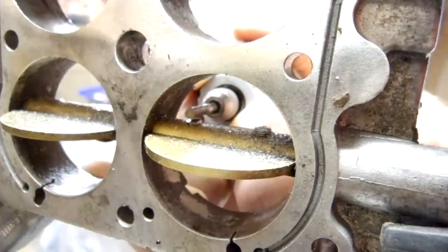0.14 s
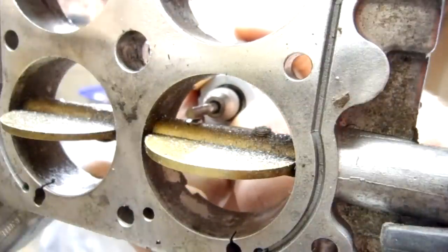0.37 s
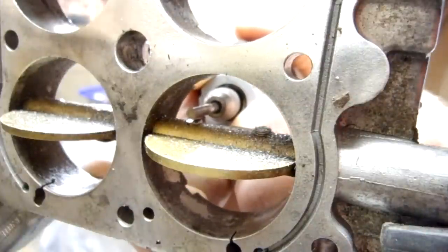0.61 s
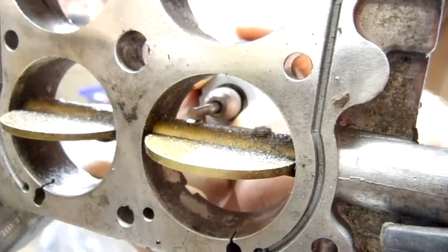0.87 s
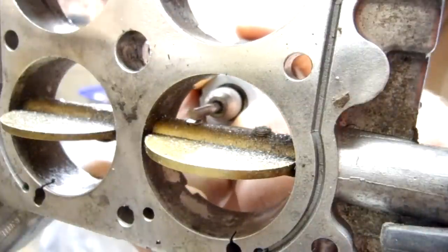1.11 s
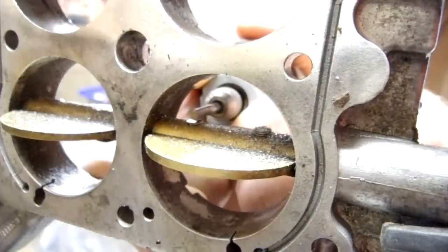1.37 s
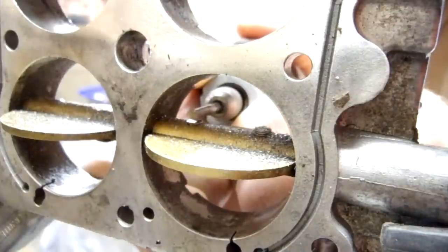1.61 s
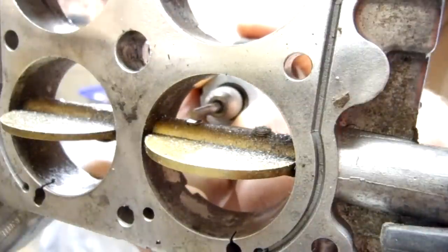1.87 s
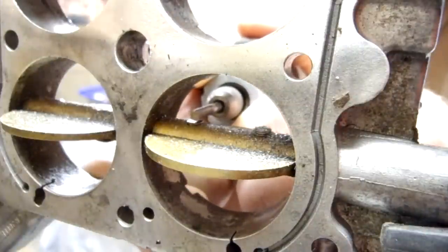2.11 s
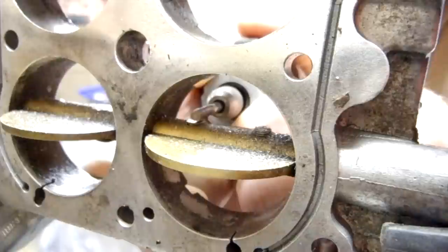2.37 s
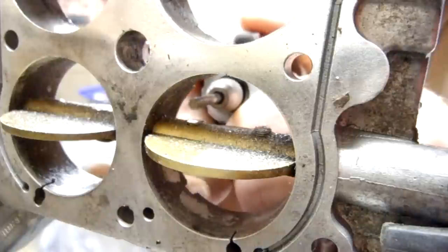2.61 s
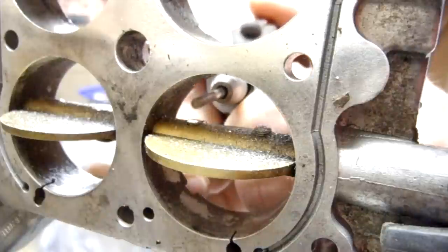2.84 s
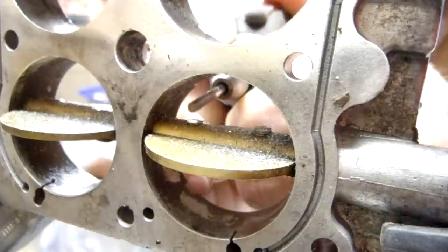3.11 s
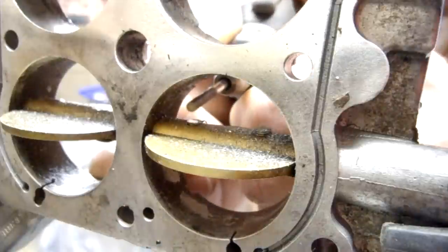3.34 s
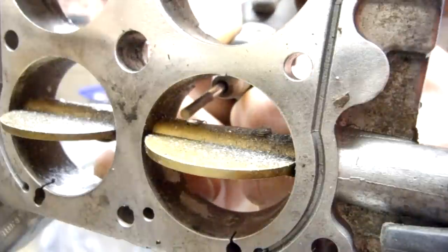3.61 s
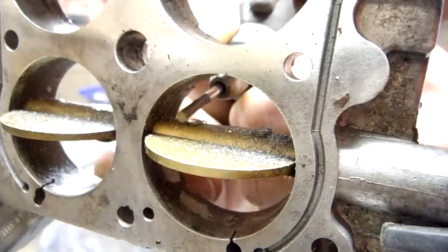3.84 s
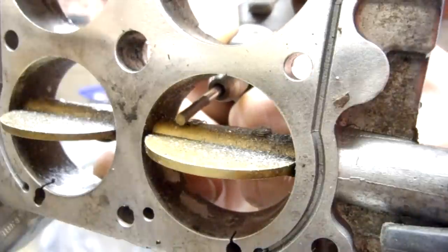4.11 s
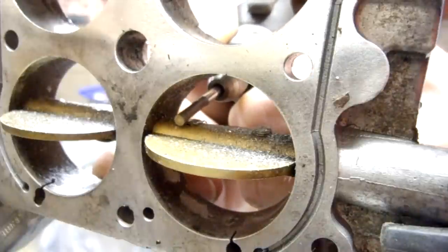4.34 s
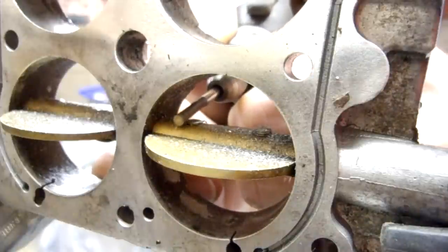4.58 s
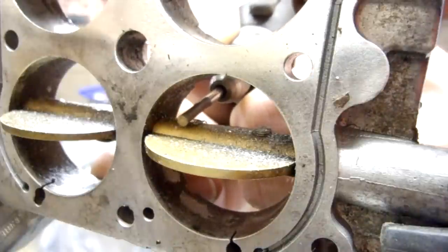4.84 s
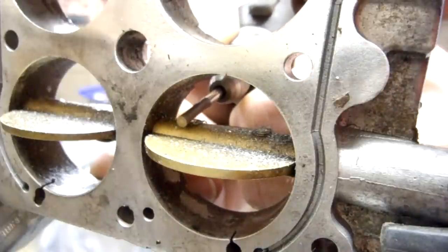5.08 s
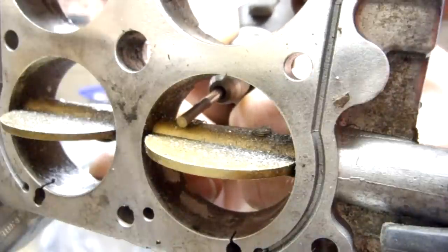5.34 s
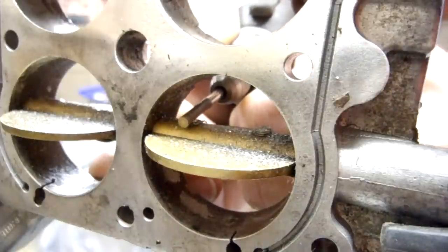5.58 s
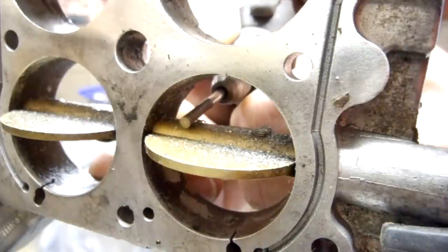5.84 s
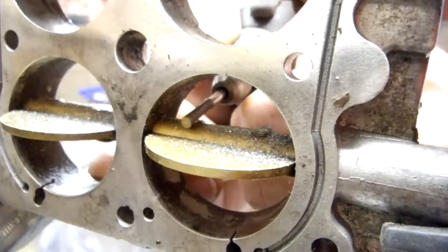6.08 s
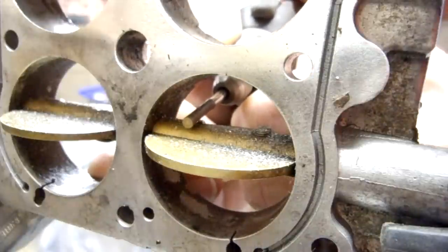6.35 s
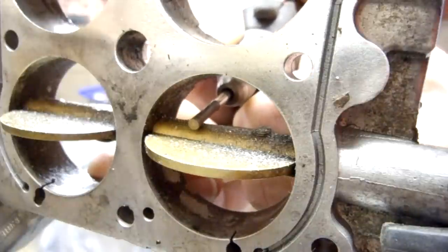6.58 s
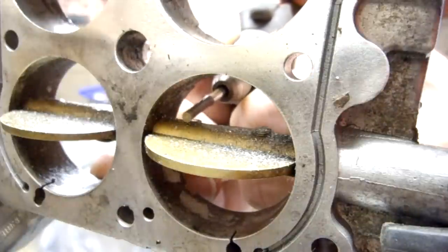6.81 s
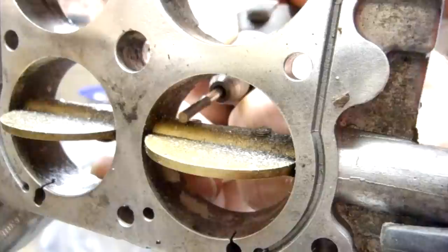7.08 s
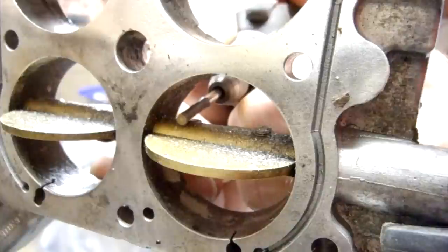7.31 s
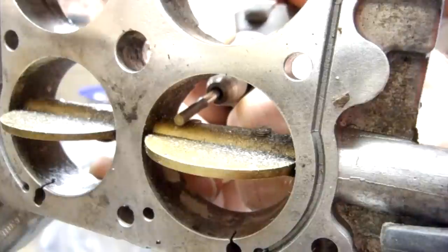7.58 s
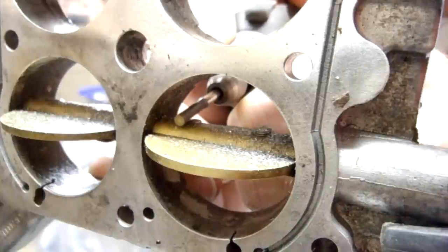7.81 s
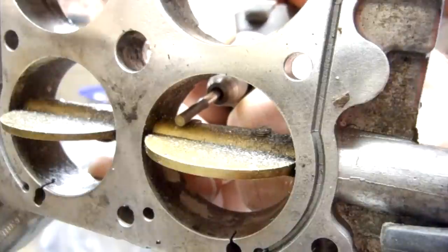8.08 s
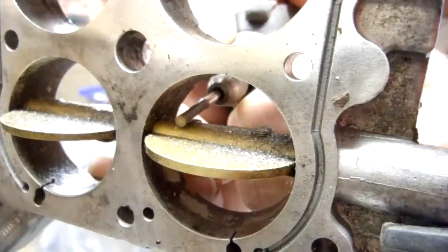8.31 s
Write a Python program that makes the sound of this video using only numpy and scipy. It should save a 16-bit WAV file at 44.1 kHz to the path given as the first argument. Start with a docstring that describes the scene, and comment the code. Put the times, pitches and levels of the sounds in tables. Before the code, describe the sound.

Close, bright rotary-burr grinding on a brass plate, steady then rougher in bursts, with airy motor whine swelling in the gaps over faint hum.

```python
"""A small rotary tool grinds a brass part in a clamped casting, close to a phone in a workshop;
between cuts the motor's rush and bearing whistles swell up over a low mains hum.
Grinding: near-repeating blows once a turn excite resonances, with clean multiples of the turn rate.
Motor: tones locked to the shaft, coloured noise for the air, an imbalance tone and hum.
The shaft turns more slowly under load; a short diffuse tail differs between the sides."""
import sys
import numpy as np
from scipy import signal
from scipy.fft import rfft, irfft
from scipy.io import wavfile
from scipy.ndimage import uniform_filter1d, map_coordinates

SR = 44100
rng = np.random.default_rng(int(sys.argv[2]) if len(sys.argv) > 2 else 0)


def gain_from_db(level_db):
    """Turn a decibel level (scalar or array-like) into a linear amplitude factor."""
    decades = np.asarray(level_db, float) / 20
    return 10 ** decades


def to_wav(s):
    """Save 16-bit WAV."""
    ch = np.atleast_2d(s).T  # columns
    pcm = np.round(np.clip(ch, -1, 1) * 32767)  # PCM
    wavfile.write(sys.argv[1], SR, pcm.astype(np.int16))


N = 372183
T = np.arange(N) / SR
BINS_HZ = np.fft.rfftfreq(N, 1 / SR) + 1  # +1 keeps log and division finite

# spots where the burr bears: [from t/s, bore over plate/dB, shank over bite/dB, sizzle over bite/dB]
SPOTS = [(0, -4.5, -15, 0), (.3, 1, -10, 0.5), (.85, 0.5, -16.5, -1), (1.5, -2.5, -13.5, -1.5),
         (2.05, -0.5, -15, -0.5), (4.1, 14, -6.5, -11), (4.24, 9.5, -1.5, -3.5), (4.46, 0.5, -5.5, -4),
         (4.76, 6, -7.5, -3.5), (5.45, 3, -14.5, -3.5), (6.3, 2.5, -16, -5), (7.28, 7.5, -7, -4),
         (7.55, 2.5, -11.5, -2.5)]


def unit(x):
    """Scale to rms 1."""
    return x / np.sqrt(np.mean(x ** 2))


def columns(table):
    """Curve columns interpolated at every sample."""
    s, *cols = np.transpose(table)
    return [np.interp(T, s, c) for c in cols]


def contact_columns(tables):
    """Curves of all contacts, at -80 dB while the burr is lifted off."""
    rows = list(tables[0])
    off = (-80,) * (len(rows[0]) - 1)
    for table in tables[1:]:
        if table[0][0] - rows[-1][0] > 0.1:
            rows += [(rows[-1][0] + 0.01, *off), (table[0][0] - 0.01, *off)]
        rows += table
    return columns(rows)


def at_spot(table, size=3000):
    """Per-spot values at every sample; the burr takes size samples to move on."""
    spot = np.searchsorted(np.array(SPOTS)[:, 0], T, side="right") - 1
    return uniform_filter1d(np.array(table, float)[spot], size, axis=0).T


def colour(x, points):
    """Shape the spectrum by (f/Hz, gain/dB) points, linear in log frequency."""
    hz, db = np.transpose(points)
    gain_db = np.interp(np.log(BINS_HZ), np.log(hz), db)
    return irfft(rfft(x) * gain_from_db(gain_db), N)


def coloured_noise(points):
    """Noise of rms 1 with the given spectral shape."""
    return unit(colour(rng.standard_normal(N), points))


def walk(rate_hz):
    """Random levels held 1 / rate_hz and slewed twice; spread near 1."""
    k = int(SR / rate_hz)
    held = np.repeat(rng.standard_normal(N // k + 1), k)
    return 1.3 * uniform_filter1d(uniform_filter1d(held, k), k)[:N]


def shaft():
    """Shaft angle in turns: the running sum of the turn rate."""
    # shaft speed: [t/s, turn rate/Hz]
    speed = [(0, 270.1), (.2, 271.0), (.47, 268.9), (.64, 266.6), (.95, 264.8), (1.31, 264.7),
             (1.76, 261.6), (1.97, 261.5), (2.06, 267.2), (2.14, 270.6), (2.25, 271.9), (2.54, 272.8),
             (2.62, 276.2), (2.75, 276.5), (3.94, 276.7), (4.2, 276.1), (4.26, 274.9), (4.43, 274.4),
             (4.53, 269.0), (4.65, 268.4), (4.78, 272.8), (4.95, 274.2), (5.29, 274.4), (5.38, 271.9),
             (5.52, 270.3), (6.03, 271.4), (6.17, 270.6), (6.31, 272.2), (6.58, 272.8), (6.72, 276.5),
             (7.68, 276.0), (7.92, 272.6), (8.09, 269.4), (8.44, 268.0)]
    return np.cumsum(columns(speed)[0]) / SR


def mains_hum():
    """Hum with a weak third harmonic and wandering level, over low rumble noise."""
    # rumble spectrum: [f/Hz, relative density/dB per Hz]
    rumble_shape = [(15, -3), (25, -1), (45, 1), (75, -9), (120, -17.5), (200, -68)]
    hum_hz = 57.9
    wave = np.sin(2 * np.pi * hum_hz * T) + gain_from_db(-22.5) * np.sin(6 * np.pi * hum_hz * T)
    hum = np.sqrt(2) * gain_from_db(1.6 * walk(9)) * wave
    return hum + gain_from_db(-6.5) * coloured_noise(rumble_shape)


def low_rush():
    """Low part of the motor's rush, as steady coloured noise."""
    # rush spectrum: [f/Hz, relative density/dB per Hz]
    rush_shape = [(47, -39), (80, -30.5), (129, -16.5), (222, -18), (272, -17.5), (329, -17), (765, -10.5),
                  (823, -8), (1260, -6.5), (1520, 0), (2600, -10), (3380, -54), (5720, -120)]
    return coloured_noise(rush_shape)


def air_hiss():
    """Air through the motor: high coloured noise."""
    # hiss spectrum: [f/Hz, relative density/dB per Hz]
    hiss_shape = [(1400, -36), (2200, -12), (2700, -10), (4100, -12), (4830, -5), (5150, -5), (5300, -10),
                  (5800, -8), (8100, -7), (9000, -9), (10800, -8), (11400, -2), (11900, -7), (13100, -11),
                  (14200, -8)]
    return coloured_noise(hiss_shape)


def bearing(turn, count=150):
    """Balls and cage add a thicket of faint tones at random ratios to the shaft."""
    ratio, size, start = rng.random((count, 3)).T
    return unit(sum(gain_from_db(-9 * s) * np.sin(2 * np.pi * ((11 + 40 * r) * turn + p))
                    for r, s, p in zip(ratio, size, start)))


def bearing_whistles(turn):
    """Tones at fixed ratios to the shaft, each wandering in level and phase."""
    # whistles when running free: [f/Hz, relative level/dB]
    tones = [(829.0, -45), (990.5, -48), (2492, -42), (4689, -44), (4980, -34), (5556, -43), (5943, -43),
             (6363, -43), (6535, -46), (6934, -45), (7004, -44), (7111, -45), (7273, -46), (8059, -44),
             (8161, -46), (8280, -38), (8899, -48), (9808, -42), (9959, -47), (10148, -38), (10314, -38),
             (11052, -40), (11267, -40), (11332, -35), (11606, -38), (12161, -46), (12236, -46),
             (12516, -44), (13695, -44), (13997, -48)]
    free_hz = 276.6
    return sum(gain_from_db(db + 1.7 * walk(7.8)) * np.sin(2 * np.pi * (hz / free_hz * turn + 0.09 * walk(30)))
               for hz, db in tones)


def motor(turn):
    """Whistles, hiss and bearing throbbing once a turn, low rush, imbalance tone and hum."""
    # motor as heard: [t/s, common rush and whistle gain/dB, imbalance tone rms/dB, hum gain/dB]
    levels = [(0, -60.5, -67, -52), (.45, -58.5, -69.5, -48.5), (.84, -64, -64, -51),
              (1.15, -59.5, -55, -48), (1.45, -64, -57, -52), (1.9, -62, -66, -54), (2.42, -60, -76, -49),
              (2.49, -61.5, -61, -49), (2.63, -61.5, -58, -47), (2.72, -54.5, -51.5, -41),
              (3.01, -48.5, -46.5, -43), (3.4, -46.5, -45, -46), (4.14, -45, -44, -42),
              (4.4, -53, -51, -46), (4.79, -60.5, -55.5, -50), (5.5, -58.5, -63.5, -50),
              (6.1, -55, -61.5, -49), (6.7, -56.5, -52.5, -45), (6.86, -51.5, -51, -47.5),
              (7.4, -47.5, -47, -42), (7.52, -53.5, -52, -45), (7.9, -56.5, -54, -50),
              (8.09, -59, -71, -51), (8.44, -60.5, -78, -50)]
    rush_db, tone_db, hum_db = columns(levels)
    whistle_swell_db_per_db, free_rush_db = 0.25, -40.5
    # whistles swell faster than the rush
    whistle_db = 52 + whistle_swell_db_per_db * (rush_db - free_rush_db)
    throb = 1 + 0.047 * np.cos(2 * np.pi * turn)
    running = gain_from_db(whistle_db) * bearing_whistles(turn)
    running += gain_from_db(25.0) * air_hiss() * throb
    running += gain_from_db(16.5) * bearing(turn) * throb
    running += gain_from_db(17.0) * low_rush()
    imbalance = np.sqrt(2) * np.sin(2 * np.pi * turn)
    return gain_from_db(rush_db) * running + gain_from_db(tone_db) * imbalance + gain_from_db(hum_db) * mains_hum()


def casting_drone(turn):
    """The casting drones on multiples 2, 3 and 4 of the turn rate while the burr bears."""
    # drone, one table a contact: [t/s, second/dB, third/dB, fourth multiple/dB]
    drone = [
        [(0.0, -53.5, -48.5, -44), (0.43, -50.5, -48, -39), (0.45, -54, -62, -41.5), (0.57, -54, -50, -40),
         (0.9, -48, -53, -37), (1.45, -50, -61, -47), (1.53, -46.5, -51.5, -43.5), (2.47, -56.5, -49, -44.5),
         (2.55, -75, -70, -66)],
        [(4.3, -55, -46, -45), (4.63, -43, -42, -37), (4.71, -48, -49, -64), (4.82, -72, -64, -61),
         (5.14, -51.5, -53, -43.5), (5.53, -50.5, -41, -37.5), (6.53, -50.5, -40, -37.5), (6.63, -55, -50, -54),
         (6.66, -75, -70, -65)],
        [(7.55, -75, -54, -51), (7.582, -64, -52, -55), (7.614, -57, -75, -66), (7.656, -52, -47, -49),
         (7.704, -55, -40.5, -37.5), (8.044, -46.5, -41, -39.5), (8.074, -50, -52, -39), (8.164, -51, -40, -38),
         (8.44, -52, -60, -39.5)],
    ]
    return sum(np.sqrt(2) * gain_from_db(db + 0.93 * walk(30)) * np.sin(2 * np.pi * (k * turn + 0.11 * walk(20)))
               for k, db in enumerate(contact_columns(drone), 2))


def overtones(turn, first, last):
    """Clean multiples of the turn rate; those that the spot favours stand out."""
    # three multiples favoured at each spot: [multiple, multiple, multiple of the turn rate]
    favoured = [(8, 10, 17), (11, 12.5, 17.5), (12, 13, 17), (6.5, 12, 17), (8, 10, 17.5), (9, 15, 17),
                (9.5, 15, 17), (10.5, 11, 16), (7, 11, 17.5), (9.5, 11, 18), (7, 9, 14), (7, 10, 17),
                (7, 10, 17.5)]
    # usual balance of multiples 5 to 19, one entry each: [relative level/dB]
    orders_db = [-6, 3, 4, 3.5, 6, 3.5, 4, 1.5, -0.5, -2.5, -1, 0, 1, 1.5, -2]
    favour_db, favour_width_multiples = 4, 0.9
    k = np.arange(first, last + 1)
    away = (k - np.array(favoured)[:, :, None]) / favour_width_multiples
    lift_db = favour_db * np.exp(-away ** 2).max(axis=1)
    levels_db = at_spot(np.array(orders_db)[k - 5] + lift_db)
    gains = gain_from_db(levels_db) / np.sqrt(np.sum(gain_from_db(2 * levels_db), axis=0) / 2)  # summed power 1
    lagging = turn + 0.002 * walk(40)
    # nearby phases bunch the multiples into one knock a turn
    return sum(gain * gain_from_db(2.5 * walk(14) + 1.2 * walk(5))
               * np.sin(2 * np.pi * (k * lagging + 0.085 * walk(4)))
               for k, gain in enumerate(gains, first))


def blows(turn, memory_turns, length_turns, grit_db, size=256, count=58):
    """Burr force over a turn: a rough pattern that each turn nearly repeats, plus fresh grit."""
    turns = int(turn[-1]) + 2
    keep = np.exp(-1 / max(memory_turns, 1))
    fresh = rng.standard_normal((2, turns + 300, size))  # 300 turns to settle
    pattern = signal.lfilter([np.sqrt(1 - keep ** 2)], [1, -keep], fresh[0], axis=0)
    pattern = pattern + gain_from_db(grit_db) * fresh[1]
    # the high side of the burr bites once a turn and lets go
    contact = np.exp(-np.arange(size) / size / length_turns) + 0.088
    strength = gain_from_db(0.34 * rng.standard_normal((turns, 1)))
    spectrum = rfft(pattern[300:] * contact * strength)[:, :count]
    return map_coordinates(irfft(spectrum, size).ravel(), [turn * size], order=3)


def ring(x, modes):
    """Causal resonances, each applied twice so that the valleys stay dark."""
    gain = sum(gain_from_db(db) / (1 + 1j * (hz / w) * (BINS_HZ / hz - hz / BINS_HZ) / 1.39) ** 2
               for hz, w, db in modes)
    return irfft(rfft(x) * gain, N)


def bite():
    """Gains of the burr's bite and of the lower resonances, over strokes and glances."""
    # burr on metal, one table a stroke: [t/s, bite/dB, lower resonances/dB]
    contacts = [
        [(0.0, -30, -34), (0.022, -27.5, -35.5), (0.278, -25, -36.5), (0.342, -24, -27.5), (0.4, -27, -36),
         (0.466, -22.5, -24), (0.52, -26.5, -28), (0.742, -23.5, -31.5), (0.946, -27, -27), (1.0, -23, -30)],
        [(1.01, -24, -28), (1.254, -23.5, -30), (1.332, -26, -28.5), (1.35, -23, -30), (1.578, -25, -27.5),
         (1.636, -23, -29.5), (1.672, -27, -32), (1.682, -25, -29.5), (1.966, -25, -31), (2.02, -32, -32)],
        [(2.03, -31, -39), (2.042, -30, -38), (2.146, -28, -32), (2.23, -25.5, -37), (2.332, -26.5, -37),
         (2.436, -27, -36), (2.492, -21, -38), (2.51, -20.5, -30.5), (2.53, -37, -43), (2.55, -40, -48)],
        [(4.09, -25, -27), (4.108, -31, -36), (4.128, -15, -22.5), (4.228, -24, -29.5), (4.26, -21.5, -15),
         (4.286, -17, -20), (4.316, -18, -16.5), (4.378, -23.5, -23.5), (4.392, -19, -19.5), (4.46, -23, -21.5)],
        [(4.47, -24, -19), (4.478, -22, -20), (4.59, -27, -26.5), (4.628, -26, -20), (4.654, -22, -26.5),
         (4.698, -24.5, -24.5), (4.714, -38, -28), (4.718, -28, -31), (4.756, -25, -28.5), (4.77, -33, -37)],
        [(4.79, -33, -44), (4.81, -28.5, -28), (4.998, -25, -29.5), (5.036, -24.5, -27.5), (5.074, -30, -39),
         (5.088, -28, -26.5), (5.176, -28, -30), (5.252, -24.5, -27.5), (5.45, -26, -26.5),
         (5.52, -24.5, -29.5)],
        [(5.53, -32, -36), (5.552, -25, -32), (5.8, -26, -30.5), (6.076, -23, -29.5), (6.464, -25.5, -29.5),
         (6.514, -20.5, -27), (6.6, -21.5, -29), (6.624, -19, -32), (6.644, -31, -36), (6.66, -33, -48)],
        [(7.27, -22, -34), (7.288, -27, -42), (7.298, -22, -33.5), (7.348, -21.5, -31), (7.364, -33, -47),
         (7.396, -31, -42), (7.42, -18, -23), (7.442, -20, -30), (7.498, -16.5, -25.5), (7.52, -29, -41)],
        [(7.535, -38, -45), (7.561, -22, -28.5), (7.795, -21.5, -25.5), (7.809, -28, -31), (7.907, -22, -28.5),
         (7.975, -28.5, -31), (8.061, -20.5, -25.5), (8.169, -29, -29.5), (8.183, -25.5, -31),
         (8.44, -24, -29.5)],
    ]
    # burr glances off the part: [peak t/s, peak/dB]
    glances = [(6.959, -17)]
    rise_s, fall_db_per_s = 0.011, 600
    gain, low = gain_from_db(contact_columns(contacts))
    for s, db in glances:
        rise = np.clip(1 + (T - s) / rise_s, 0, 1)
        knock = rise * gain_from_db(db - fall_db_per_s * np.maximum(T - s, 0))
        gain = gain + knock
        low = low + gain_from_db(-6) * knock
    return gain, low


def grinding(turn):
    """Blows ring each family of resonances; the lower two also sing clean multiples."""
    # resonances of plate, bore, ring, shank, sizzle: [f/Hz, nominal width/Hz, relative level/dB]
    families = [
        [(2040, 820, 9.5), (2627, 640, 17.5), (3137, 74, 22)],
        [(3670, 3300, 4.5), (4350, 500, -2)],
        [(5910, 1030, -10), (6740, 1050, -12.5), (7956, 230, 6), (8910, 790, -2)],
        [(9750, 1000, -7.5), (10570, 950, 3), (11300, 1100, -3.5)],
        [(12400, 330, -18), (13970, 2100, 25), (14060, 3200, 0)],
    ]
    # blows on the same families: [shape memory/turns, contact decay/turns, grit over pattern/dB, gain/dB]
    strikes = [(19, 0.38, -0.5, -6.5), (19.8, .15, 4, -4), (22, .2, -3, 2), (25, 0.092, 2.5, 1.5),
               (20, 0.12, 2, 2)]
    # skidding instead of repeating the cut, one entry a spot: [rough part of plate and bore/dB]
    skid_db = [4, -3.5, -8, -8, -1.5, -1, -7, 6, -6, 4, 4, 4, 3]
    ring_db, plate_db = -3, -4  # ring over the bite; plate and bore about the lower-resonance level
    chatter = walk(25)
    _, bore_db, shank_db, sizzle_db = at_spot(SPOTS)
    skid = gain_from_db(at_spot(skid_db))
    gain, low = bite()
    gains = [low * gain_from_db(plate_db - bore_db / 2), low * gain_from_db(plate_db + bore_db / 2),
             gain * gain_from_db(ring_db), gain * gain_from_db(shank_db), gain * gain_from_db(sizzle_db)]
    sung = [overtones(turn, first=5, last=12), overtones(turn, first=13, last=19), 0, 0, 0]
    rough_share = [skid, skid, 1, 1, 1]
    part = 0
    for g, modes, tones, share, strike in zip(gains, families, sung, rough_share, strikes):
        memory_turns, length_turns, grit_db, rough_db = strike
        rough = unit(ring(blows(turn, memory_turns, length_turns, grit_db), modes))
        flutter = gain_from_db(1.22 * chatter + 0.5 * walk(13))
        part = part + g * flutter * (tones + share * gain_from_db(rough_db) * rough)
    return part + casting_drone(turn)


def scene():
    """Both sources sit near the phone; a short diffuse tail differs between the sides."""
    # left over right microphone: [f/Hz, level/dB]
    balance = [(60, -2), (110, 6), (200, -5.5), (380, -1), (700, -3), (1290, -2.5), (2380, -1.5),
               (4390, -1.5), (8100, 3.0), (15000, 9)]
    # diffuse sound over near sound: [f/Hz, level/dB]
    diffuse_share = [(40, -37), (90, -31), (160, -7), (400, -21), (2500, -21), (5000, -28.5), (9000, -31),
                     (14000, -48)]
    # phase by which the left microphone port leads: [f/Hz, phase/rad]
    left_leads = [(60, 0.05), (1500, 0.078), (2410, 0.3), (3700, 0.016), (4650, 0.88), (5510, 0.2),
                  (5860, 0.88), (6980, 0.05), (15200, 0.05)]
    turn = shaft()
    near = grinding(turn) + motor(turn)
    decay = gain_from_db(-60 * T[:4000] / 0.1)  # 60 dB in 0.1 s
    tail = unit(rng.standard_normal(4000) * decay) / np.sqrt(4000)
    diffuse = colour(signal.fftconvolve(near, tail)[:N], diffuse_share)
    half = [(hz, db / 2) for hz, db in balance]
    lead = np.exp(1j * np.interp(BINS_HZ, *np.transpose(left_leads)))
    left = irfft(rfft(colour(near + diffuse, half)) * lead, N)
    right = colour(near - diffuse, [(hz, -db) for hz, db in half])
    return np.array([left, right])


def top_cut(x):
    """Nothing passes above the cut-off."""
    return signal.sosfilt(signal.butter(12, 15550, fs=SR, output="sos"), x)


def record(dry):
    """The loudest peaks clip; a steep low-pass leaves next to nothing above 14.2 kHz."""
    top_hz = 14200
    low_pass = signal.ellip(16, 0.5, 75, top_hz, fs=SR, output="sos")
    cut = signal.sosfilt(low_pass, np.clip(dry, -1, 1))
    return top_cut(cut)


dry = scene()
out = record(dry)
to_wav(out)
```